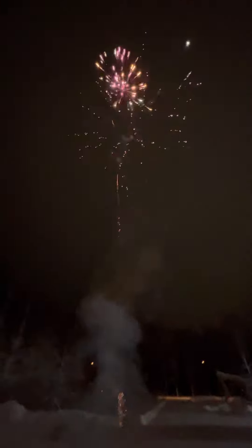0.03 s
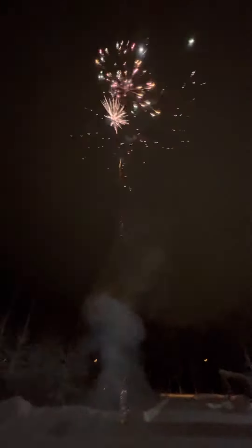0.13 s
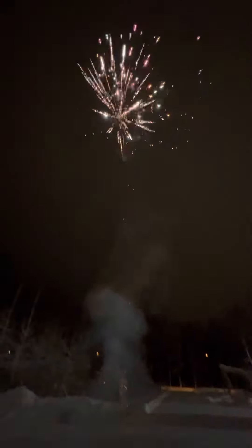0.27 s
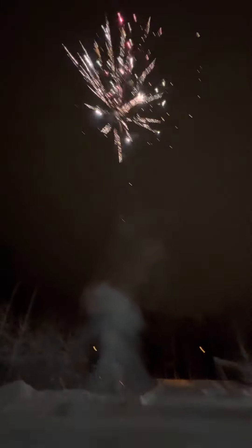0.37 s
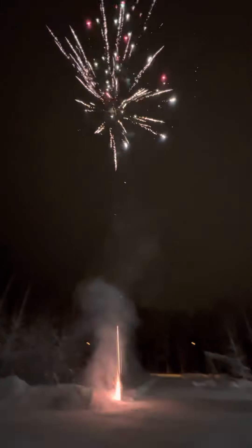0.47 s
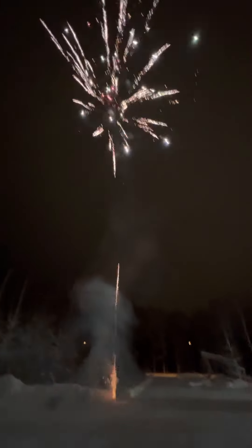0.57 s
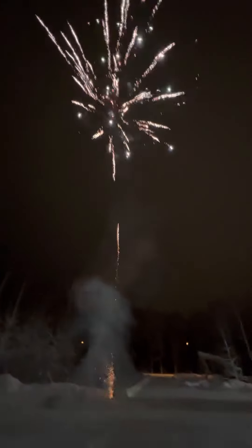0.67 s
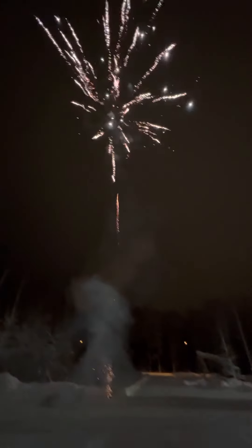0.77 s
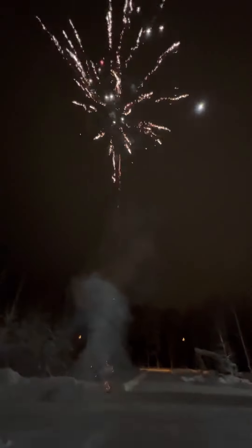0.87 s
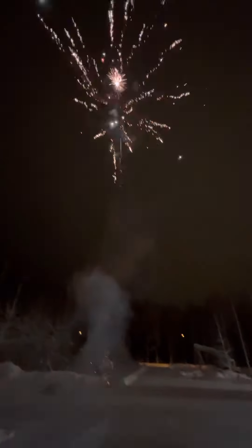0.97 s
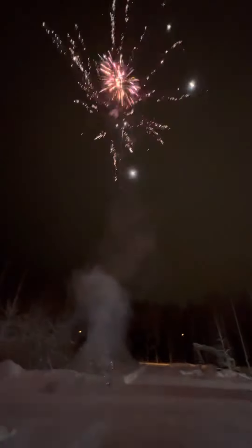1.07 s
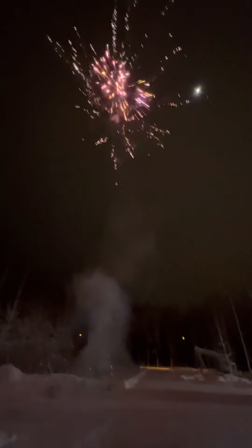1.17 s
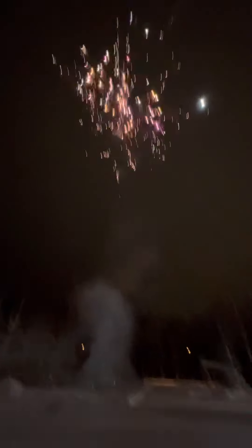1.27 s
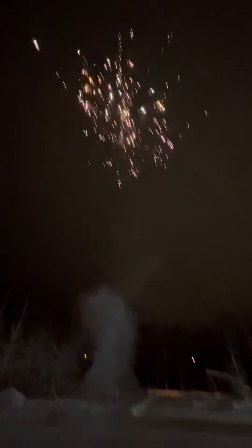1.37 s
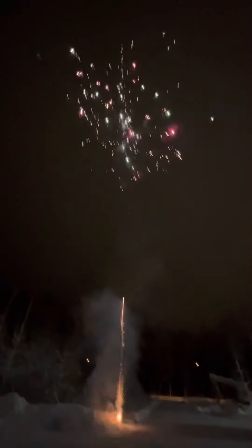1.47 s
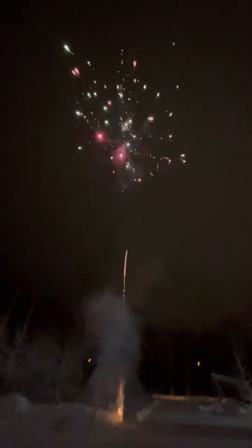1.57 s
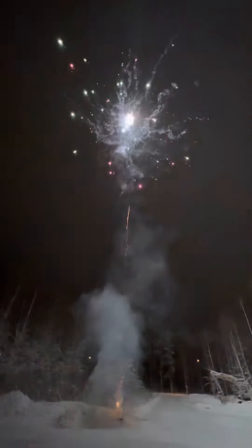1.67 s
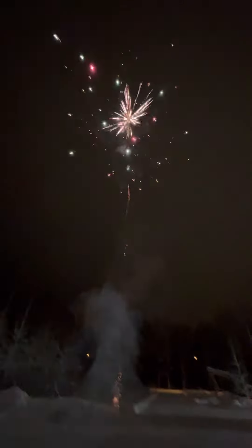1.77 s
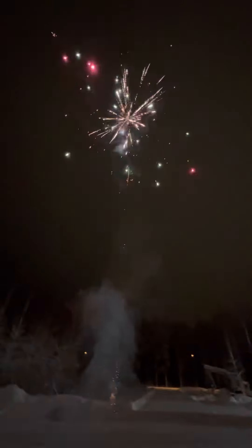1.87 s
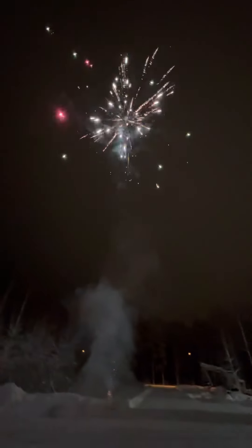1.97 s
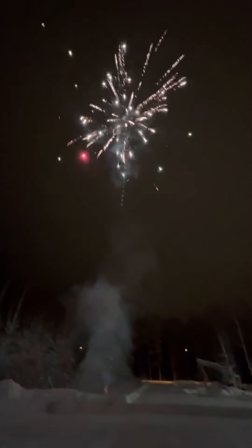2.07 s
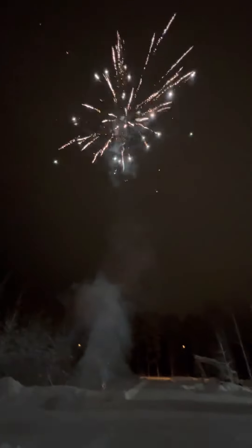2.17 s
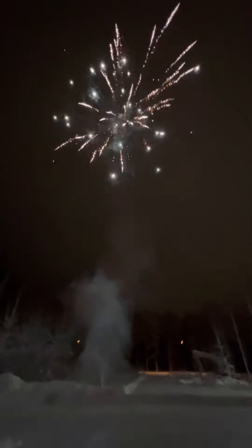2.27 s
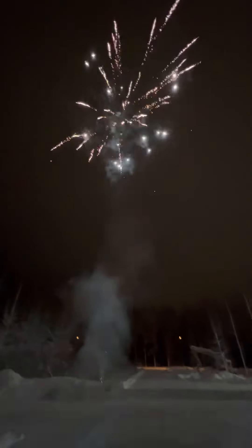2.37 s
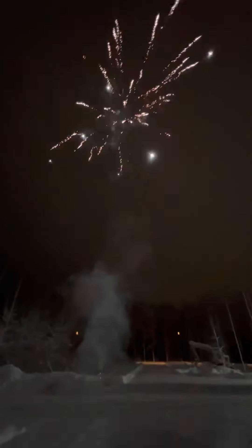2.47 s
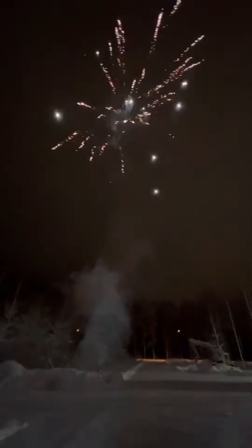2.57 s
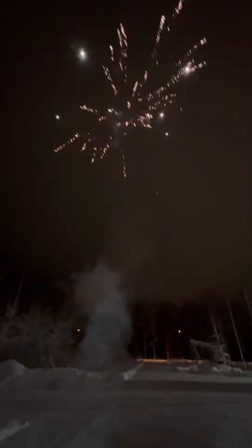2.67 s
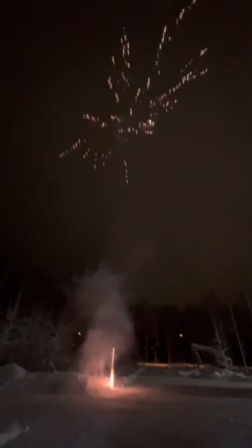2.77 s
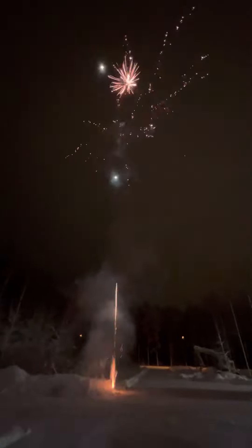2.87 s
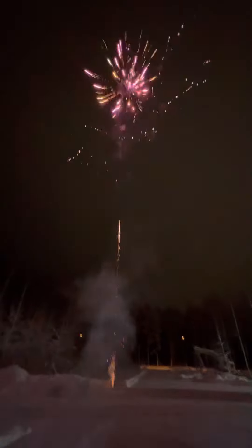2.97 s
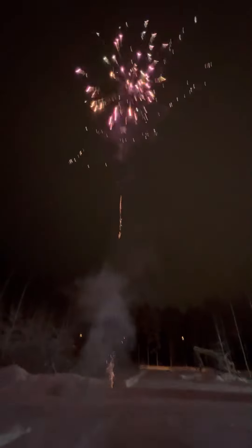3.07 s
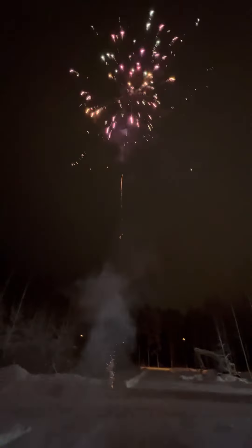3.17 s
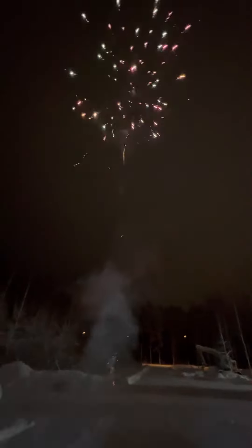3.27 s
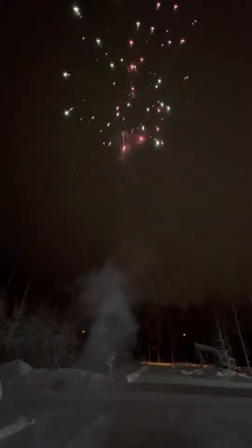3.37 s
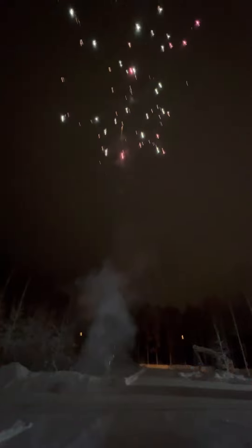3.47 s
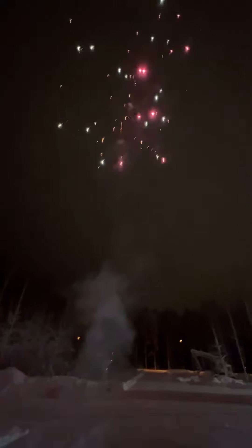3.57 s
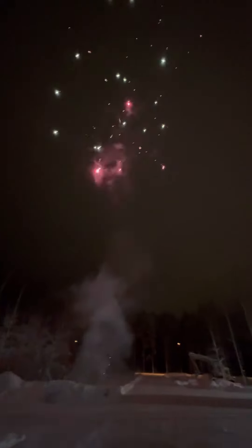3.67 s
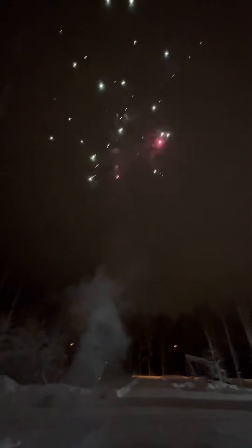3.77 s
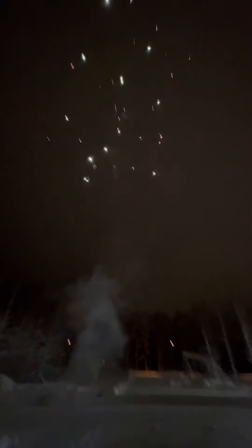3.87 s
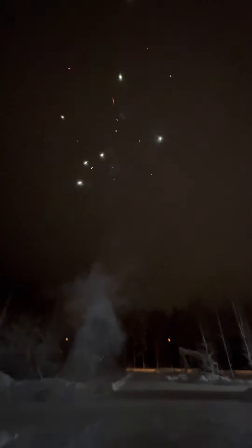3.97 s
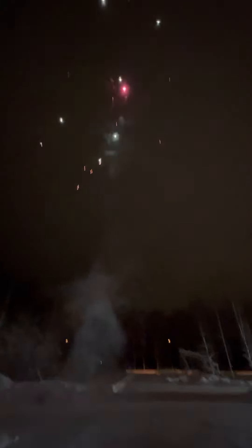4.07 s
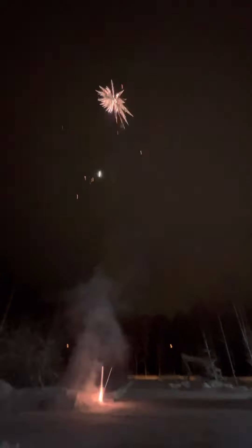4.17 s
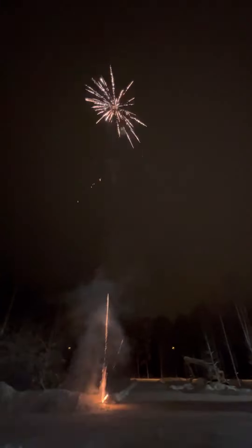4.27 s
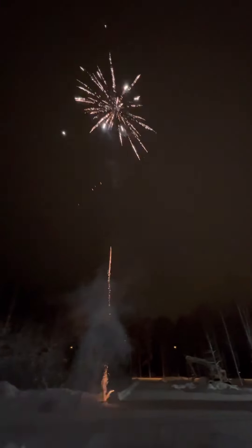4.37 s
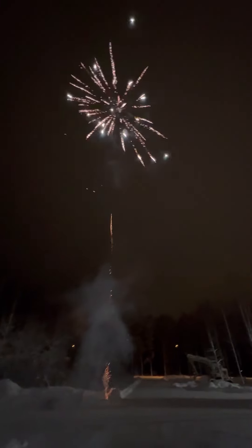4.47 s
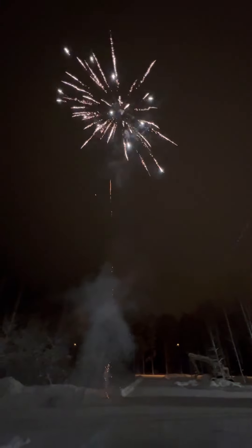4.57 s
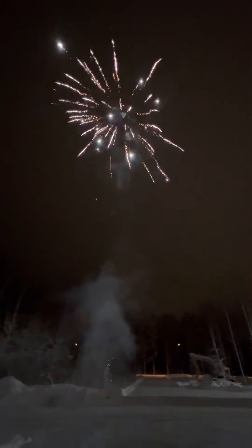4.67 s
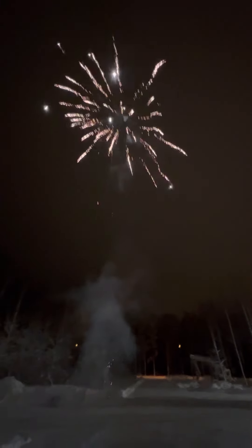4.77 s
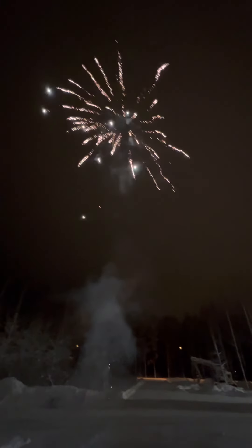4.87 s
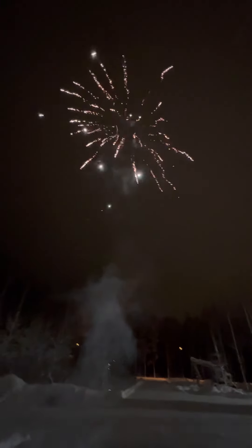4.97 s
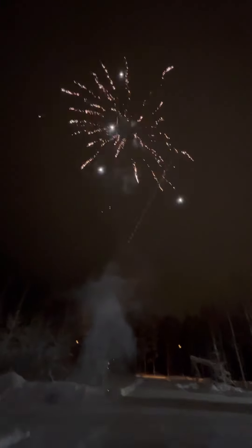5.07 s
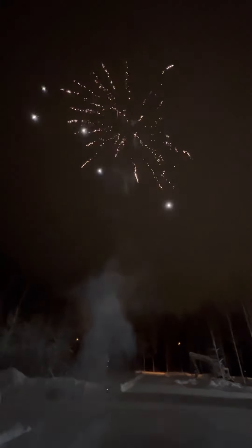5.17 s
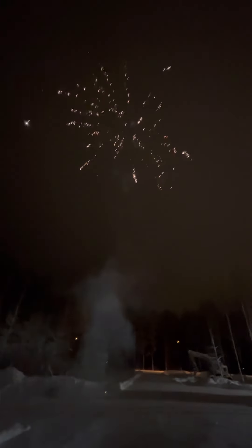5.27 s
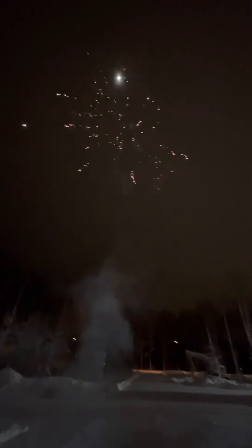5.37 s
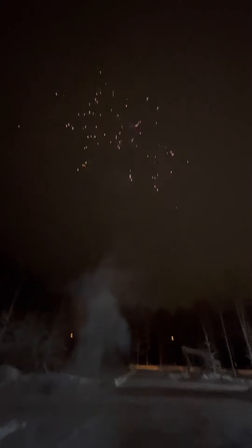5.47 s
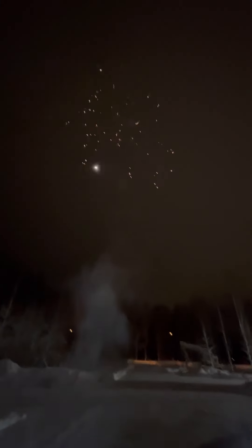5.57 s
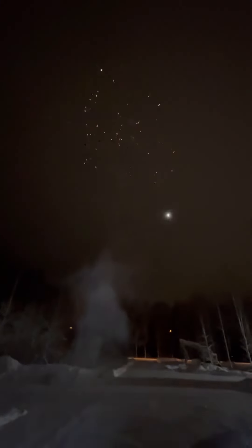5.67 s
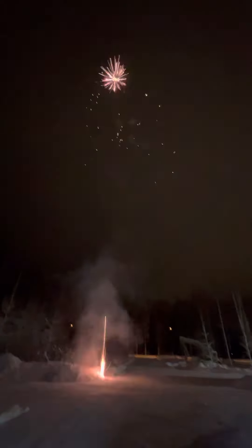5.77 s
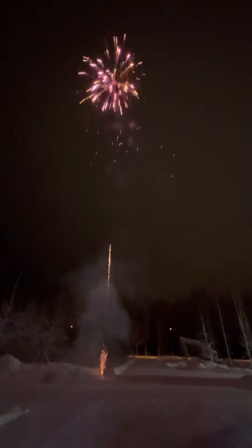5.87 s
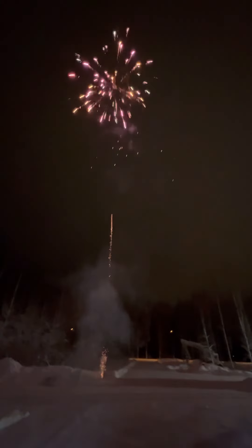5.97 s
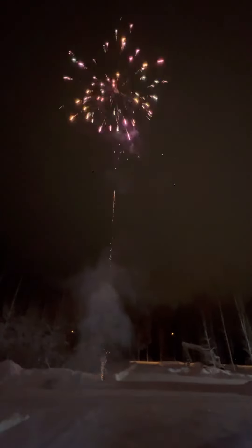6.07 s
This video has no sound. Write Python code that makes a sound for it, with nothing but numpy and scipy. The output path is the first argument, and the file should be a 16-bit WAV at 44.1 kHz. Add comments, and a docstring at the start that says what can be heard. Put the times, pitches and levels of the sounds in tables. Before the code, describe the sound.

A firework cake fires in a snowy clearing at night, with dull tube thumps, sharp bangs overhead and echoes rolling through the forest.

```python
"""A snowy clearing at night, where a firework cake fires: shells pop out of tubes and burst high overhead.
Each shot is a minimum-phase pressure pulse, followed by distinct echoes off walls, banks and trunks.
Noise shaped in half-octave bands forms the rumble, the returns of trees and forest, and the night air.
Random snaps make the sizzle of the stars; resonantly filtered noise makes the faint hiss of the fuse.
"""
import sys
import numpy as np
from scipy import signal
from scipy.fft import rfft, irfft, next_fast_len
from scipy.io import wavfile
from scipy.ndimage import uniform_filter1d, minimum_filter1d

SR = 44100
rng = np.random.default_rng(int(sys.argv[2]) if len(sys.argv) > 2 else 0)


def generate_wav(signal):
    """Clip the signal to [-1, 1] and save it as 16-bit WAV at the path in sys.argv[1]."""
    frames = np.transpose(np.atleast_2d(signal))
    scaled = np.clip(frames, -1, 1) * 32767
    pcm = np.round(scaled).astype(np.int16)
    wavfile.write(sys.argv[1], SR, pcm)


N = 270333
BLAST_SIZE = 8192  # samples in one blast
DEEP_HZ, BASS_HZ, MIDDLE_HZ, TREBLE_HZ = 80, 250, 700, 1700  # corners of the tone curves
SOUND_M_PER_S = 330


# Shells bursting overhead, all levels relative: (time [s], boom [dB], crack [dB], deep bass [dB],
# near trees [dB], forest [dB], slaps [dB], extra echo path from the drift of the shell [m],
# sizzle of the stars [dB])
BURSTS = [(-.13, -1, -19, 9, 5, -6, -18, 0, -65), (0.1562, -3, -10.5, 4, 7, 2, -1.5, 2.7, -74.5),
          (1.074, -2.5, -8.5, 4.5, 4, -3.5, -1.5, 0, -68.5),
          (1.7843, -0.5, -7.5, -0.5, 5, -2, -2, 0.4, -87),
          (2.9192, -2, -10.5, 4.5, 3.5, -2, -2.5, 0.75, -70.5),
          (4.2445, 0, -7, 2.5, 4.5, 0.5, -4, -0.6, -95.5), (5.8542, 0.5, -8.5, 2, 5, -4, -2.5, -1.8, -75)]
# Basic spectrum of a burst: (frequency [Hz], relative level [dB])
BURST_SPECTRUM = [(25, 9.5), (38, 26.5), (52, 35.5), (85, 33.5), (150, 30.5), (300, 34.5), (550, 31),
                  (720, 24.5), (950, 17.5), (1900, 28.5), (2800, 20.5), (4500, 23), (7200, 21), (10000, 13),
                  (16000, -3)]
# Colouring by the two microphone ports of sound from above: (frequency [Hz], left minus right [dB])
FROM_ABOVE = [(60, -1.5), (350, 0), (850, -4), (1300, 13), (2100, 0), (2900, -15), (4000, 12), (5000, -2),
              (7000, 3), (14000, 0)]
# Walls, banks and trunks that answer each burst: (delay without drift [s], share of the drift [-],
# relative bass [dB], relative middle [dB], relative treble [dB])
BURST_SLAPS = [(.058, 1, -25.5, -7, -31), (.095, .7, -13, -18.5, -39), (.114, 0.035, -13, -31.5, -57),
               (.177, 0.08, -38, -12, -36.5), (.2515, 0.058, -34.5, -20.5, -35.5)]


def bursts():
    """Explosion overhead and image source: a pulse, its ground reflection and its delayed echoes."""
    out = np.zeros((2, N))
    for s, boom_db, crack_db, deep_db, _, _, slaps_db, drift_m, _ in BURSTS:
        tone = [(DEEP_HZ, deep_db), (BASS_HZ, boom_db), (MIDDLE_HZ, boom_db), (TREBLE_HZ, crack_db)]
        bang = blast(BURST_SPECTRUM, tone, FROM_ABOVE, left_lag_ms=.33, ground=.53,
                     ragged=.22, ragged_s=.0008)
        add(out, bang, s)
        for delay_s, share, *colour in BURST_SLAPS:
            echo_s = s + delay_s + share * drift_m / SOUND_M_PER_S
            add(out, from_db(slaps_db) * slap(*colour), echo_s)
    return out


# Lift charges in the tubes, all levels relative: (time [s], boom [dB], crack [dB], near trees [dB],
# crack of the slaps [dB])
LAUNCHES = [(0.4817, -2.5, -1, 2, -1), (1.4198, -4, -0.5, 1, -2.5), (2.7988, -4, -6.5, -0.5, -7.5),
            (4.2264, 1, 4.5, 1.5, -2.5), (5.7766, -10, -4, 4, 7)]
# Basic spectrum of a launch: (frequency [Hz], relative level [dB])
LAUNCH_SPECTRUM = [(25, 16), (60, 28.5), (170, 33.5), (300, 29), (450, 22), (650, 27.5), (1000, 14),
                   (1500, 13), (2800, 20), (4500, 14.5), (7000, 8), (10000, 6), (16000, -6.5)]
# Colouring by the microphone ports of sound from ahead: (frequency [Hz], left minus right [dB])
FROM_AHEAD = [(60, 2), (700, 3.5), (1000, -3), (2000, 2), (2900, -7), (4000, -5.5), (5500, 3), (8000, -3),
              (14000, 0)]
# What stands around the tubes and answers each launch: (delay [s], relative bass [dB],
# relative middle [dB], relative treble [dB])
LAUNCH_SLAPS = [(.030, -36, -23.5, -27.5), (.037, -31, -21, -27), (.095, -34, -18.5, -37),
                (.126, -20.5, -21.5, -35.5)]


def launches():
    """Muzzle blast: each lift charge sends out a pulse with scattered treble, then discrete echoes."""
    out = np.zeros((2, N))
    for s, boom_db, crack_db, _, slap_crack_db in LAUNCHES:
        tone = [(MIDDLE_HZ, boom_db), (TREBLE_HZ, crack_db)]
        pop = blast(LAUNCH_SPECTRUM, tone, FROM_AHEAD, left_lag_ms=.026, ground=0,
                    ragged=.94, ragged_s=.0012)
        add(out, pop, s)
        for delay_s, bass_db, middle_db, treble_db in LAUNCH_SLAPS:
            add(out, slap(bass_db, middle_db, treble_db + slap_crack_db), s + delay_s)
    return out


def blast(spectrum, tone, ports, left_lag_ms, ground, ragged, ragged_s, ragged_hz=3500, snow_hz=2200,
          ground_delay_s=.0095):
    """Shock pulse: minimum phase, scattered short waves and an optional dull reflection off snow."""
    hz = np.arange(BLAST_SIZE // 2 + 1) * SR / BLAST_SIZE
    t = np.arange(BLAST_SIZE) / SR
    gain = from_db(at_hz(spectrum, hz) + at_hz(tone, hz)) * left_right(at_hz(ports, hz))
    pulse = causal(gain)
    # the shortest waves are scattered on the way and trail just behind the front
    scatter = rng.standard_normal(BLAST_SIZE) * np.exp(-t / ragged_s)
    scatter /= np.sqrt(np.sum(scatter ** 2))
    share = np.clip(ragged, 0, 1) * hz ** 4 / (hz ** 4 + ragged_hz ** 4)
    pulse = pulse * (np.sqrt(1 - share) + np.sqrt(share) * rfft(scatter))
    pulse[0] *= np.exp(-2j * np.pi * hz * left_lag_ms / 1000)
    bounce = ground * np.exp(-2j * np.pi * hz * ground_delay_s) / (1 + 1j * hz / snow_hz)
    fade = np.clip(2 - 4 * t / t[-1], 0, 1)
    return irfft(pulse * (1 + bounce)) * fade


def causal(gain):
    """Minimum phase by cepstral folding: the energy of a gain curve arrives as early as possible."""
    cepstrum = irfft(np.log(gain))
    cepstrum[:, 1:BLAST_SIZE // 2] *= 2
    cepstrum[:, BLAST_SIZE // 2 + 1:] = 0
    return np.exp(rfft(cepstrum))


# Balance of the echoes at the two ports: (frequency [Hz], left minus right [dB])
ECHO_BALANCE = [(60, 1), (200, 3), (650, 5.5), (1300, -1), (2400, 1.5), (8000, -0.5)]


def slap(bass_db, middle_db, treble_db):
    """Rough-surface reflection: one distinct echo whose crack is smeared over a few milliseconds."""
    tone = [(BASS_HZ, bass_db), (MIDDLE_HZ, middle_db), (TREBLE_HZ, treble_db),
            (7000, treble_db - 6), (16000, treble_db - 20)]
    echo = blast(BURST_SPECTRUM, tone, ECHO_BALANCE, left_lag_ms=0, ground=0,
                 ragged=.85, ragged_s=.0025, ragged_hz=1318)
    return from_db(-2) * echo


# Likeness of the echoes at the two ports, clipped to -1..1: (frequency [Hz], likeness [-])
LIKENESS = [(50, 0.6), (150, 0.8), (300, 1.3), (640, 0.13), (1400, 0.98), (3000, 0.3), (6000, -0.5),
            (15000, 0.66)]


def rolling_echoes(trunks_db=1.5, clumps_db=.85):
    """Diffuse scattering: noise for countless reflections, bunched by trunks and clumps of trees.

    The night air is part of the same noise.
    """
    size = next_fast_len(N)
    spectra = rfft(rng.standard_normal((2, size)))
    hz = np.arange(size // 2 + 1) * SR / size
    alike = np.clip(at_hz(LIKENESS, hz), -1, 1)
    # a shared part plus a part of opposite sign sets the likeness of the channels
    ports = np.sqrt(1 + alike) * spectra[0] + np.sqrt(1 - alike) * spectra[1] * [[1], [-1]]
    ports = ports * left_right(at_hz(ECHO_BALANCE, hz))
    t = np.arange(0, N, 32) / SR  # coarse times for the envelopes
    now = np.arange(N) / SR
    bunching = from_db(trunks_db * flutter(t, per_s=490) + clumps_db * flutter(t, per_s=85))
    octave = np.log2(np.maximum(hz, 1))
    out = np.zeros((2, N))
    for centre in 28 * 2 ** (np.arange(19) / 2):
        weight = np.maximum(1 - 2 * abs(octave - np.log2(centre)), 0)
        band = irfft(ports * weight, size)[:, :N]
        # 1.5 allows for the overlap of neighbouring bands
        envelope = bunching * np.sqrt(scattered_power(t, centre) / 1.5)
        out += rms_one(band) * np.interp(now, t, envelope)
    return out


# Spectra of the scattered sound before the shot's own level, decay and air absorption,
# each: (frequency [Hz], relative level [dB per half octave])
RUMBLE = [(25, -48.5), (38, -30.5), (52, -19.5), (80, -43), (150, -36), (300, -22), (600, -67), (1200, -77)]
NEAR_BURST = [(50, -77.5), (150, -52), (350, -42.5), (650, -37.5), (1000, -48), (2000, -48.5),
              (4000, -49.5), (8000, -50.5), (11000, -61), (16000, -73)]
NEAR_LAUNCH = [(50, -73), (200, -51.5), (650, -45), (1000, -63), (2500, -53.5), (5000, -52), (8000, -52),
               (16000, -68.5)]
FOREST = [(40, -90.5), (100, -80.5), (200, -55.5), (400, -48.5), (620, -35.5), (950, -52.5), (1500, -46.5),
          (2500, -52), (4000, -55), (8000, -59.5), (16000, -81)]


def scattered_power(t, hz, air_db_per_khz_s=4.5, snow_db_per_hz_s=1.6, launch_db_per_s=55):
    """Energy addition: night air plus all returns in one band, the treble absorbed by the air."""
    power = night_air_power(hz)
    air = air_db_per_khz_s * hz / 1000  # dB per second
    for s, _, _, deep_db, near_db, forest_db, *_ in BURSTS:
        age = np.maximum(t - s, 0)
        rumble_return, near_return, forest_return = burst_returns(age)
        # only the deepest waves travel far over soft snow
        rumble = deep_db + at_hz(RUMBLE, hz) + rumble_return - snow_db_per_hz_s * hz * age
        near = near_db + at_hz(NEAR_BURST, hz) + near_return
        forest = forest_db + at_hz(FOREST, hz) + forest_return
        returns = from_db(np.array([rumble, near, forest]) - air * age)
        power = power + (t > s) * np.sum(returns ** 2, axis=0)
    for s, _, _, near_db, _ in LAUNCHES:
        age = np.maximum(t - s, 0)
        level = near_db + at_hz(NEAR_LAUNCH, hz) - (launch_db_per_s + air) * age
        power = power + (t > s) * from_db(level) ** 2
    return power


def burst_returns(age):
    """Exponential build-up and decay: relative dB of rumble, near trees and forest, age s after a burst."""
    # the rumble builds while the banks answer, then drops to a low tail
    rumble = power_sum(
        -2.5 + swell(age, full_s=.08, rise_db_per_s=69.5, hold_s=.04, fall_db_per_s=398.5),
        -5.5 - 44.5 * age)
    # snow and bushes scatter at once; the edge of the clearing answers later
    bushes = .5 - 115 * age
    edge = -6.5 + swell(age, full_s=.18, rise_db_per_s=112, hold_s=.035, fall_db_per_s=125.5)
    # the edge rings on among the trunks
    trunks = -12 + swell(age, full_s=.18, rise_db_per_s=112, hold_s=.035, fall_db_per_s=39.5)
    near = power_sum(bushes, edge, trunks)
    # the forest answers last, in one long roll
    forest = swell(age, full_s=.41, rise_db_per_s=140.5, hold_s=.086, fall_db_per_s=23.5)
    return rumble, near, forest


def stars(low_hz=3000, high_hz=10000, pops_per_s=2500, size_db=3.5):
    """Random impulse noise: burning stars sizzle in tiny, uneven snaps that swell around each burst."""
    sizes = from_db(size_db * np.minimum(rng.exponential(1, N), 4))
    pops = (rng.random(N) < pops_per_s / SR) * sizes
    band = signal.butter(2, [low_hz, high_hz], "band", fs=SR, output="sos")
    snaps = signal.sosfilt(band, pops * rng.standard_normal((2, N)) + 1e-18)
    t = np.arange(N) / SR
    burning = [sizzle_db + swell(t - s, full_s=.25, rise_db_per_s=151.5, hold_s=.5, fall_db_per_s=48.5)
               for s, *_, sizzle_db in BURSTS]
    return rms_one(snaps) * from_db(power_sum(*burning))


# Tube resonances that the fuse hisses through: (frequency [Hz], width [Hz], relative level [dB])
TUBE = [(4250, 700, -7), (6460, 1200, -14.5), (7800, 200, -13.5)]
# Flares of the fuse in the long pauses: (time of full level [s], length of hold [s], level [dB])
FLARES = [(3.5, 0.73, -76), (5.3, 0.48, -75)]


def fuse(smoulder_db=-88):
    """Resonance excited by turbulence: gas hisses through open tubes, steadily and in slow flares."""
    gas = rng.standard_normal((2, N))
    t = np.arange(N) / SR
    hiss = np.zeros((2, N))
    for hz, width, db in TUBE:
        b, a = signal.iirpeak(hz, hz / width, fs=SR)
        hiss += from_db(db) * signal.lfilter(b, a, gas)
    hiss = signal.sosfilt(signal.butter(4, 9000, fs=SR, output="sos"), hiss)
    flares = [db + swell(t, full_s=s, rise_db_per_s=50, hold_s=length_s, fall_db_per_s=40)
              for s, length_s, db in FLARES]
    return rms_one(hiss) * from_db(power_sum(smoulder_db, *flares))


# Still night air: (frequency [Hz], level [dB per half octave])
NIGHT = [(30, -104), (120, -75.5), (500, -59.5), (1500, -73.5), (4000, -83.5), (9000, -100), (16000, -112)]


def night_air_power(hz):
    """Stationary background noise: constant mean power of the still night air in one band."""
    return from_db(at_hz(NIGHT, hz)) ** 2


def swell(age, full_s, rise_db_per_s, hold_s, fall_db_per_s):
    """Exponential growth and decay, linear in dB: rises to 0 at full_s, holds, then falls."""
    rise = -rise_db_per_s * np.maximum(full_s - age, 0)
    fall = -fall_db_per_s * np.maximum(age - full_s - hold_s, 0)
    return rise + fall


def flutter(t, per_s):
    """Random modulation: unevenness of RMS 1 that changes per_s times a second."""
    return rms_one(np.interp(t * per_s, np.arange(4096), rng.standard_normal(4096)))


def power_sum(*levels_db):
    """Incoherent addition: level in dB of unrelated sounds heard together."""
    return 10 * np.log10(sum(from_db(db) ** 2 for db in levels_db) + 1e-30)


def from_db(db):
    """Decibel definition: amplitude ratio of a level."""
    return 10 ** (np.asarray(db) / 20)


def rms_one(x):
    """Effective value: scale a signal to an RMS of 1 over all its channels."""
    return x / np.sqrt(np.mean(x ** 2) + 1e-20)


def at_hz(points, hz):
    """Logarithmic pitch scale: read a spectrum on a log-frequency axis."""
    f, value = np.transpose(points)
    return np.interp(np.log(np.maximum(hz, 1)), np.log(f), value)


def left_right(db):
    """Interchannel level difference: gains of the two channels, half the difference each."""
    return from_db(np.array([[.5], [-.5]]) * db)


def add(out, sound, s):
    """Superposition: mix a stereo sound in at time s, cut at both ends of the scene."""
    start = round(s * SR)
    first, last = max(start, 0), min(start + sound.shape[1], N)
    if last > first:
        out[:, first:last] += sound[:, first - start:last - start]


def scene():
    """Linear superposition of the shots, their rolling echoes with the night air, stars and fuse."""
    return bursts() + launches() + rolling_echoes() + stars() + fuse()


def bass_lag(x, corner_hz=140, count=8):
    """All-pass dispersion: the filters hold the bass back, so each bang sweeps downward."""
    k = np.tan(np.pi * corner_hz / SR)
    pole = (1 - k) / (1 + k)
    return signal.sosfilt([[pole, -1, 0, 1, -pole, 0]] * count, x)


def limiter(x, size=15):
    """Peak limiting: a fast gain in each channel turns down around every peak above 0.84."""
    gain = np.minimum(1, .84 / (abs(x) + 1e-9))
    return x * uniform_filter1d(minimum_filter1d(gain, size), size)


def record(dry, low_cut_hz=33, top_cut_hz=16600):
    """Band limiting: the deepest bass is cut, the rest lags, peaks are limited, the top is cut."""
    low_cut = signal.butter(4, low_cut_hz, "high", fs=SR, output="sos")
    top_cut = signal.ellip(10, .1, 80, top_cut_hz, fs=SR, output="sos")
    thinned = signal.sosfilt(low_cut, dry)
    limited = limiter(bass_lag(thinned))
    return signal.sosfilt(top_cut, limited)


dry = scene()
out = record(dry)
generate_wav(out)
```